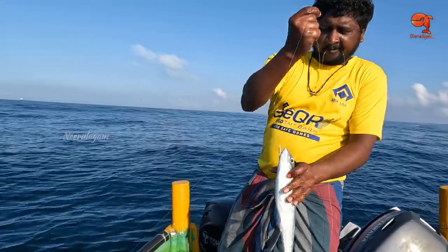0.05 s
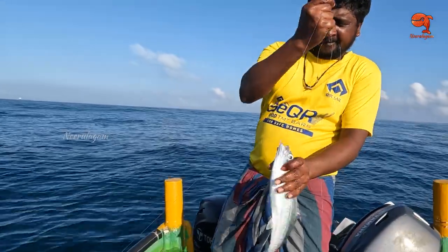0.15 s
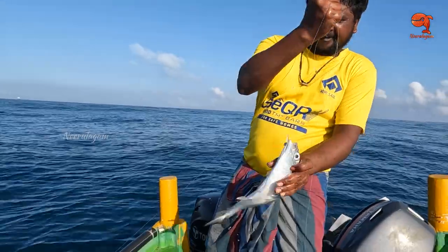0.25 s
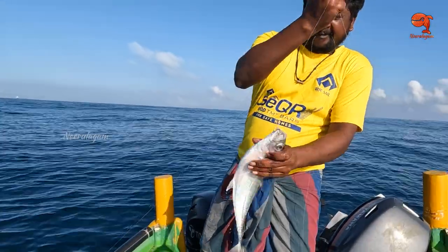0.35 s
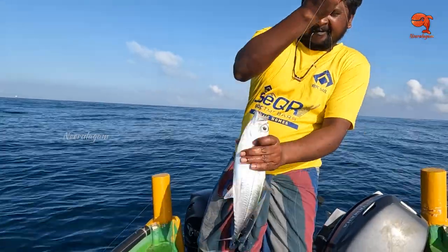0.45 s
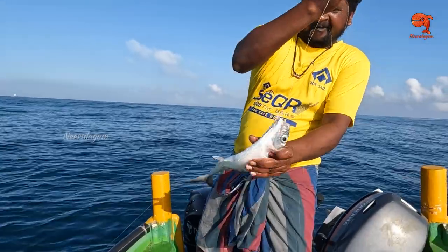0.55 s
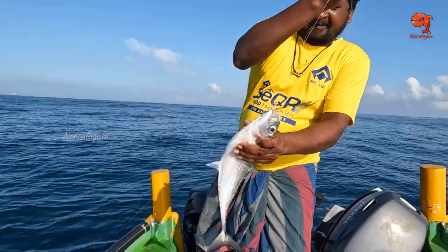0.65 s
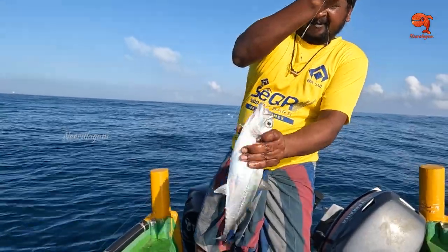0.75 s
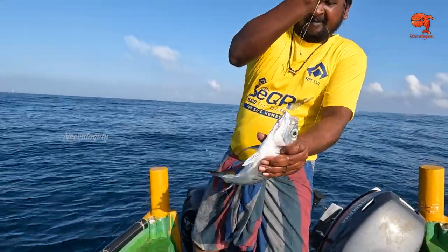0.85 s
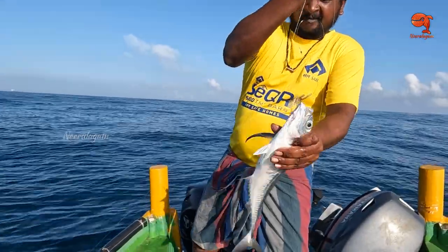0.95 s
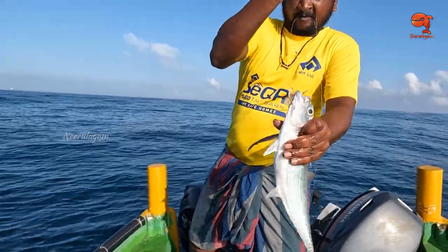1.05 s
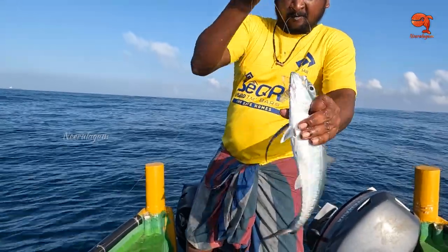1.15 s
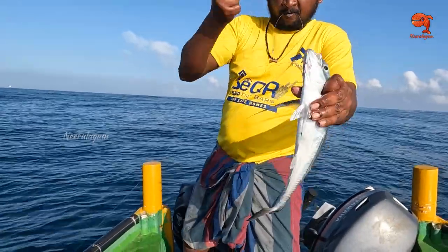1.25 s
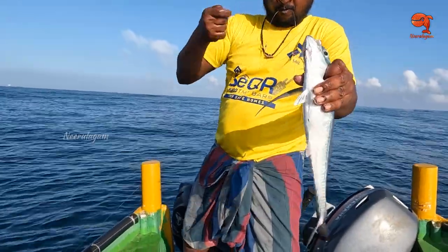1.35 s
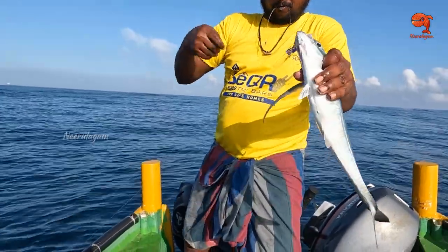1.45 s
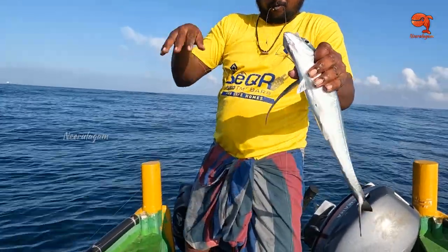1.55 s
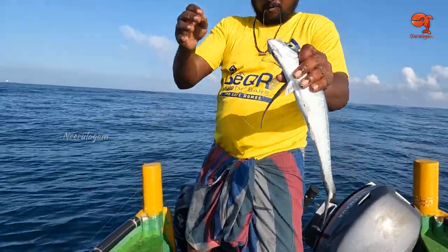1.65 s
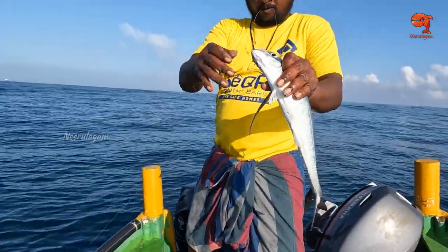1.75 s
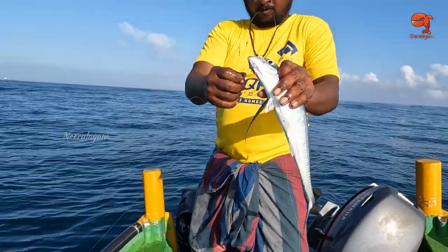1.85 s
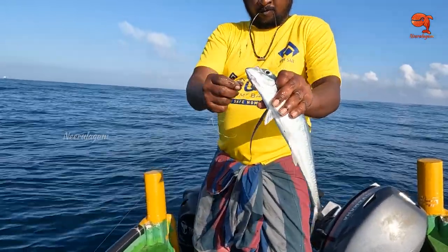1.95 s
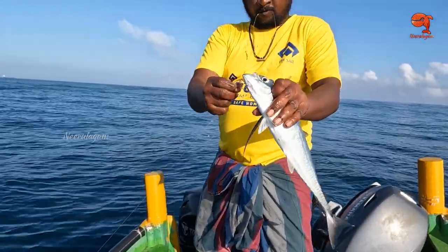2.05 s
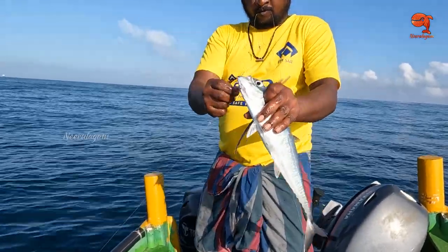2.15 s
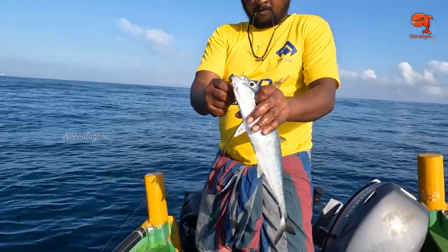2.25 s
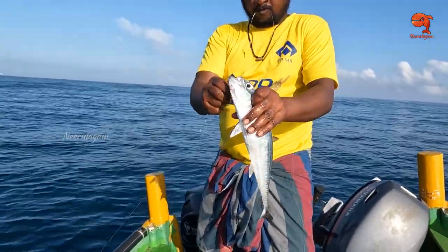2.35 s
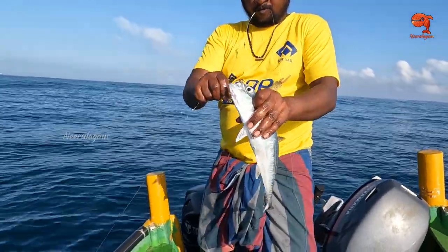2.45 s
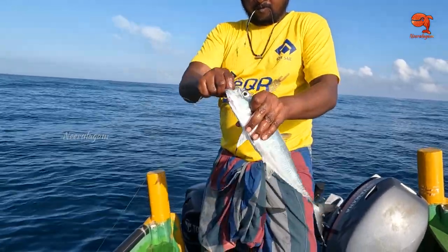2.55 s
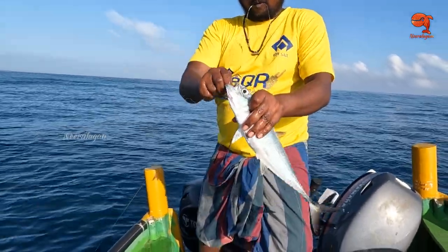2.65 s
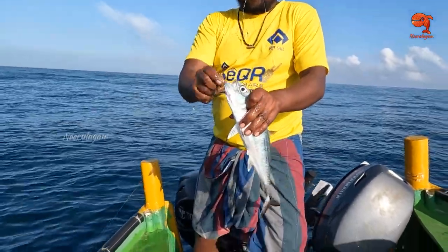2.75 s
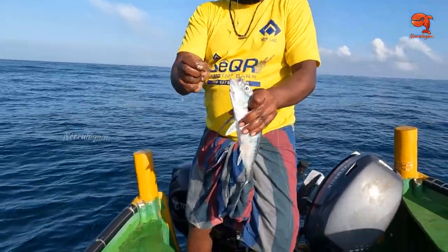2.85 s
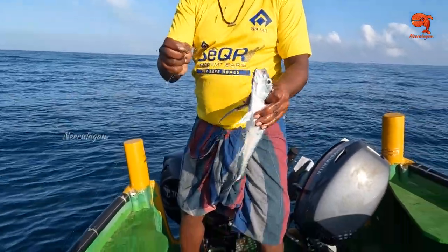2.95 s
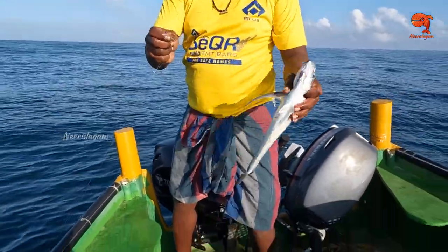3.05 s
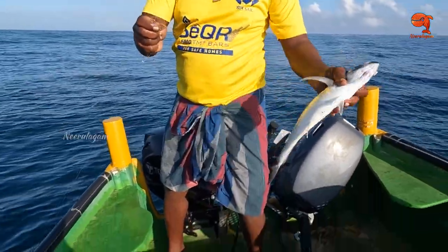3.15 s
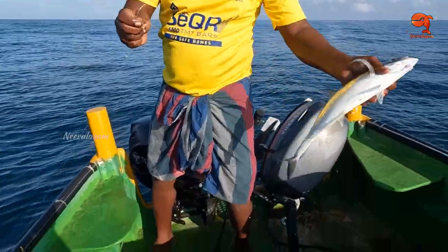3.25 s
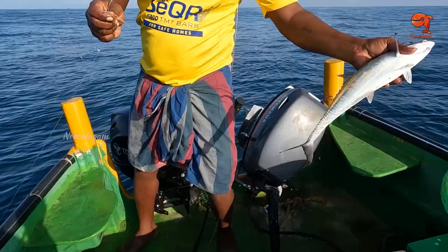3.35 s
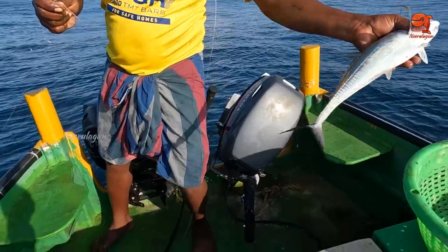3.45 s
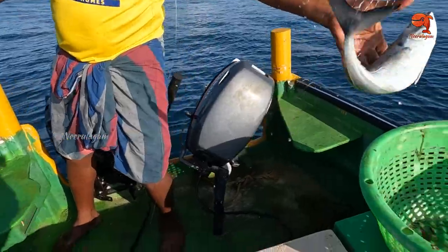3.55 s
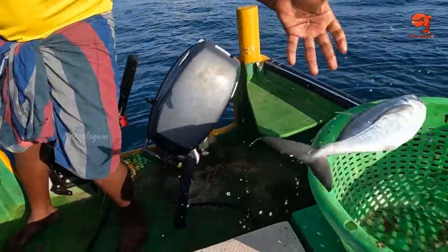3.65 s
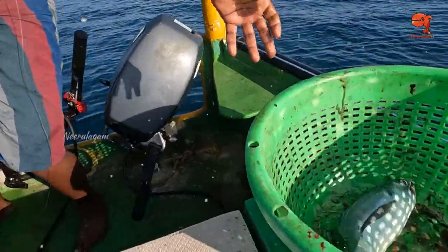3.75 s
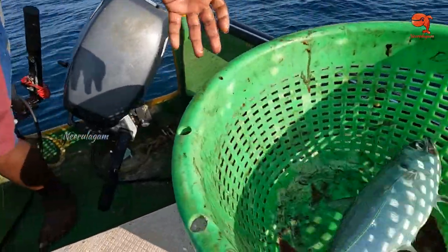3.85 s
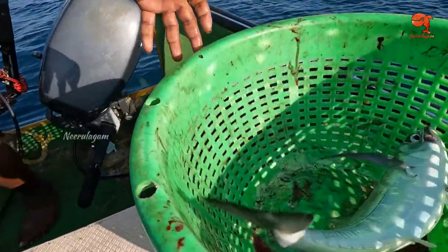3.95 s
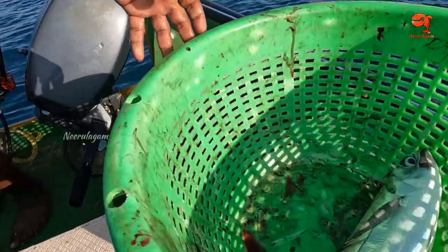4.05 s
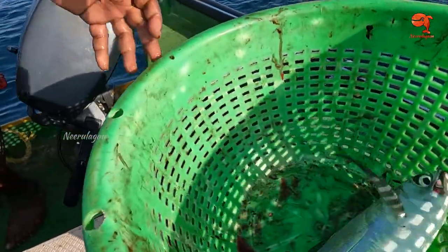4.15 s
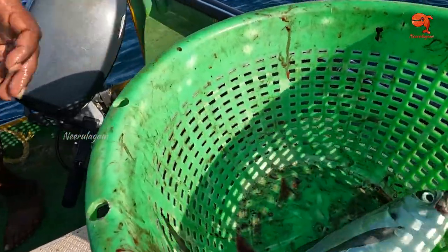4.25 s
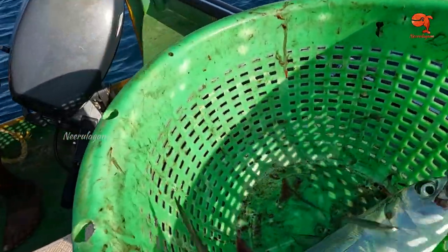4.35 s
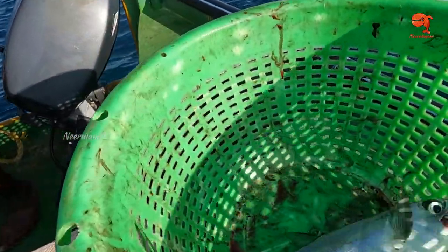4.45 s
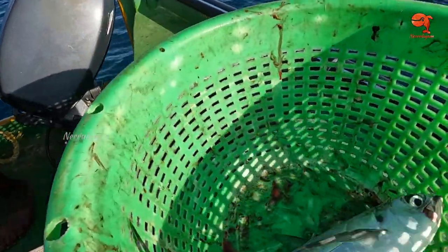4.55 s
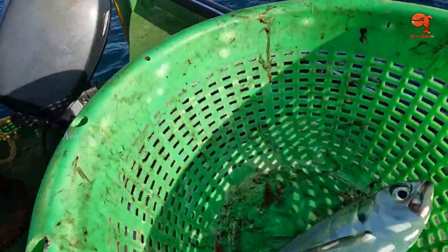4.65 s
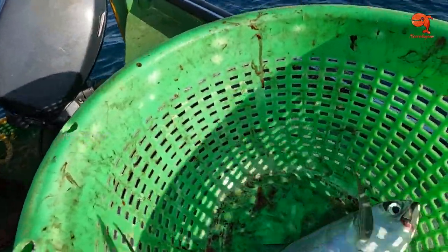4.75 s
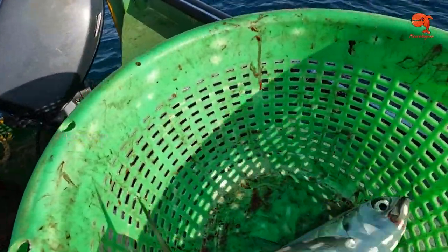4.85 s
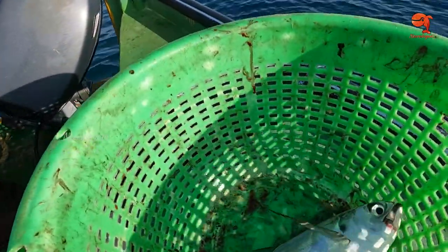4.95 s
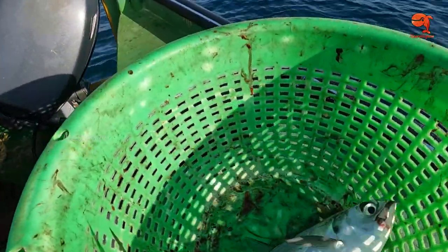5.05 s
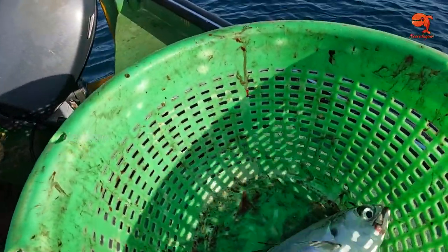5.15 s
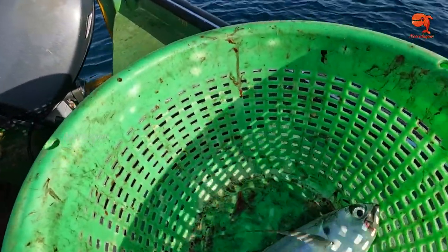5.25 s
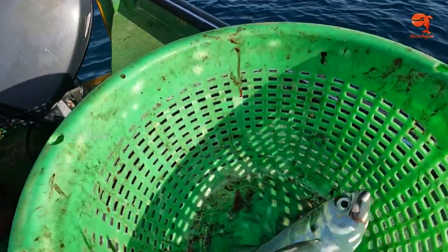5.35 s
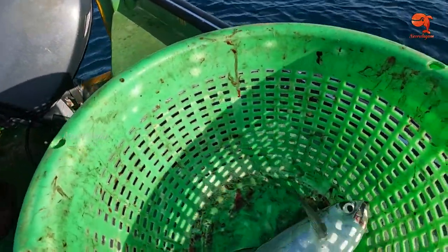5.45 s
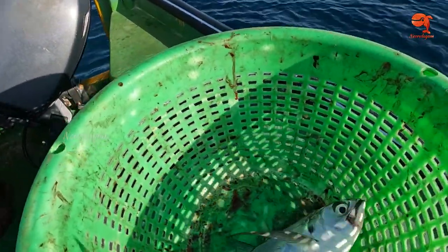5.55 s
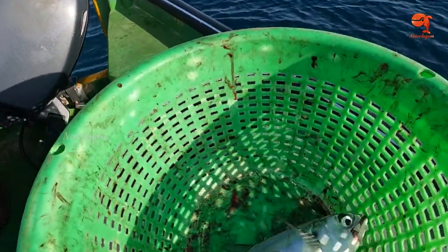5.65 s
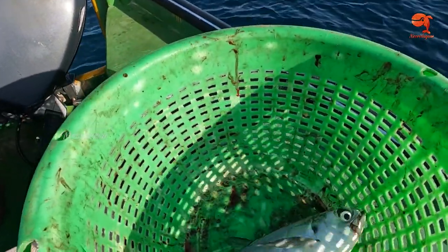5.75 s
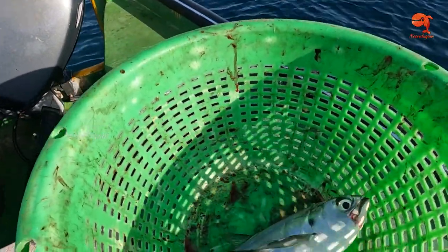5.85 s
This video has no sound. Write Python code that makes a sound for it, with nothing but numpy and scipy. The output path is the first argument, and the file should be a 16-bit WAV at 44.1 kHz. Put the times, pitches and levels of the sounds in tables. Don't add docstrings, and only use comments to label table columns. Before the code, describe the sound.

On a small open boat at sea, a fish is unhooked close to the microphone: a dull hull knock, tiny metallic tackle clicks, drips and faint wet squeaks over soft water. Near four seconds it lands hard in a plastic lattice basket and thrashes in bursts of sharp wet slaps, rattling raps and low floor thumps. A wind gust rumbles on the right, and the flapping continues to the end.

```python
import sys
import numpy as np
from scipy import signal
from scipy.io import wavfile

SR = 44100
rng = np.random.default_rng(int(sys.argv[2]) if len(sys.argv) > 2 else 0)


def file_out(sig):
    cols = np.atleast_2d(sig).T
    lim = np.clip(cols, -1, 1)
    pcm = np.round(lim * 32767).astype(np.int16)
    wavfile.write(sys.argv[1], SR, pcm)


def invert_db(level):
    return 10 ** (np.asarray(level, dtype=float) / 20)


N = 260631

# start_s, peak_db, ring_hz, crack_re_ring_db
FLANK_SLAPS = [(3.871, -23.5, 1420, 3), (3.895, -10, 1630, -5), (3.919, -10.5, 1220, -2.5),
               (3.93, -21, 1200, -7), (3.954, -13, 1350, -19), (4.001, -28, 1660, 2.5),
               (4.025, -29.5, 1700, -5), (4.146, -24.5, 1380, -2), (4.18, -11, 1060, -11.5),
               (4.231, -27, 1540, -5.5), (4.319, -24, 1670, -2.5), (4.416, -39, 1330, -28),
               (4.482, -28, 1460, -2.5), (4.527, -16.5, 1030, -13), (4.57, -26.5, 1300, -15),
               (4.792, -15, 1230, -4.5), (4.806, -15, 1300, 1.5), (4.902, -30.5, 2200, 1),
               (4.922, -11.5, 1080, -7.5), (4.944, -44, 1510, 2), (5.016, -34, 1380, -6),
               (5.081, -31.5, 1260, -3.5), (5.311, -26, 1350, -8.5), (5.333, -15, 1350, -8),
               (5.404, -30.5, 1130, -13), (5.498, -23.5, 1690, -13.5), (5.522, -12, 1140, -14.5),
               (5.596, -33, 1290, -24), (5.762, -16.5, 1150, -13.5), (5.794, -24, 2000, -13.5)]
# start_s, peak_db, ring_hz
BONE_AND_FIN_RAPS = [(3.888, -13, 2100), (3.966, -24, 3300), (4.038, -25.5, 1810), (4.15, -17.5, 1310),
                     (4.374, -27, 1750), (4.588, -15, 1900), (4.651, -30, 1600), (4.78, -25, 1390),
                     (4.862, -22.5, 1750), (4.887, -24.5, 1250), (5.049, -16.5, 1560), (5.215, -27, 1330),
                     (5.241, -19.5, 1300), (5.277, -14.5, 1760), (5.285, -22.5, 1050), (5.297, -26, 1370),
                     (5.324, -24.5, 1150), (5.388, -26.5, 1380), (5.464, -32, 1510), (5.555, -23, 1360),
                     (5.578, -15.5, 1350), (5.588, -19, 1140), (5.62, -17.5, 1100), (5.63, -18.5, 1260),
                     (5.666, -28, 1600), (5.784, -26.5, 1720), (5.818, -25.5, 1200), (5.833, -24, 1280),
                     (3.984, -36, 1300), (4.067, -41.5, 1800), (4.157, -40, 1610), (4.167, -49, 1700),
            (4.204, -32, 1400), (4.296, -33.5, 1360), (4.318, -34, 2930), (4.336, -31.5, 1890),
            (4.43, -47, 1500), (4.513, -44.5, 1160), (4.575, -34, 2000), (4.605, -36, 1400),
            (4.657, -41, 1800), (4.7, -43.5, 1500), (4.735, -45, 1310), (5.488, -34, 1770),
            (5.572, -25, 2230), (5.642, -48, 1400), (5.685, -40, 1300), (5.729, -43.5, 4000),
            (5.771, -29, 1310), (5.803, -34, 1490), (5.812, -33, 4030), (5.863, -35.5, 1200),
            (5.904, -35.5, 2200)]
# start_s, peak_db
FIN_GRAZES = [
    (4.913, -33),
    (4.962, -30),
    (5.134, -31),
    (5.163, -34.5),
    (5.269, -29),
    (5.693, -33.5),
    (5.891, -39),
]
# mode_hz, level_db, t60_s
LATTICE_MODES = [(1070, -5, 0.035), (1330, 8, 0.0054), (1750, 1, 0.0047), (2300, -10.5, 0.0017),
                 (3226, -24.5, 0.037)]
# start_s, level_db, drum_hz
BODY_FLOPS = [(3.894, -7, 95.6), (3.936, -6, 94.2), (4.155, -14.5, 94.6), (4.215, -19, 103.2),
              (4.584, -23.5, 99), (4.613, -29.5, 119), (4.647, -29.5, 109), (5.469, -20, 112),
              (5.499, -25.5, 104.4), (5.567, -18, 119.4), (5.593, -10, 99), (5.634, -11.5, 104),
              (5.72, -25.5, 100.4), (5.818, -15.5, 104.7), (5.865, -23, 101.6)]
# start_s, level_db, drum_hz
TAIL_BEATS = [(4.04, -16.5, 107), (4.807, -16.5, 88.4), (4.89, -16, 120.4), (4.914, -15.5, 108),
              (4.932, -11, 99), (4.992, -21, 108), (5.017, -32, 106), (5.045, -15, 129.4),
              (5.081, -39, 110), (5.174, -13.5, 105), (5.247, -17, 111), (5.263, -20.5, 120),
              (5.309, -13.5, 98.5)]
# start_s, peak_db, ring_hz
HARD_SNAPS = [(0.4595, -36, 3500), (0.8206, -26.5, 5000), (1.079, -24.5, 3540), (1.1094, -33, 5000),
              (1.1438, -34, 4500), (1.1558, -30, 4500), (1.1947, -17.5, 3020), (1.2536, -25, 7000),
              (2.4135, -37, 2500), (3.063, -34, 7750), (3.8716, -11, 6000), (3.889, 3, 2000),
              (3.8965, -16, 3500), (3.8995, 0.5, 3000), (3.9225, -11, 3520), (3.9555, -5.5, 2300),
              (4.528, -29, 3000), (4.5765, -13.5, 5500), (4.588, -17, 2500), (4.923, -15.5, 2150),
              (5.636, -3.5, 1480), (3.9204, -2, 2420), (0.44, -22.5, 1960)]
# start_s, peak_db, ring_hz, crack_re_ring_db
HULL_TICKS = [(0.025, -23.5, 2070, 0.5), (0.03, -19.5, 784, -6), (0.061, -29.5, 930, -20),
              (0.142, -35.5, 820, -14), (0.207, -46, 1400, -11), (0.438, -31.5, 2050, -18),
              (0.457, -43.5, 2270, -19), (0.549, -38, 1830, -6.5), (0.76, -50.5, 1900, 6),
              (0.891, -35.5, 1350, -25.5), (0.916, -38.5, 1370, -38), (1.177, -29.5, 1300, -15),
              (1.191, -27, 1070, -15), (1.233, -31, 1430, 5.5), (1.252, -33.5, 6660, 14.5),
              (2.183, -41, 2320, -17), (2.321, -34.5, 1000, -23), (2.346, -26, 870, -28),
              (2.36, -29, 1020, -43), (2.413, -28, 1750, -31), (2.415, -31.5, 3580, -15),
              (2.673, -36, 1640, -26.5), (2.827, -34, 2310, -50), (2.84, -38, 2270, -23),
              (3.063, -59, 5030, 15), (3.23, -44.5, 1430, -11), (3.324, -35, 1130, -34),
              (3.362, -38, 1070, -8), (3.682, -33, 2030, -5)]
# start_s, peak_db, ring_hz
TACKLE_CLICKS = [(0.819, -30.5, 4250), (1.078, -27.5, 3460), (1.111, -36.5, 5860), (1.143, -34, 3900),
                 (1.156, -32.5, 3700), (1.196, -30.5, 3070), (1.239, -25, 4800), (1.479, -39.5, 7200),
                 (1.513, -37, 5500), (1.701, -47, 5330), (2.566, -45.5, 5600), (2.71, -34.5, 3750),
                 (2.81, -40, 5260), (3.635, -33, 3500), (3.789, -34, 5200), (3.835, -37, 5750),
                 (5.592, -20.5, 4900)]
# start_s, peak_db, ring_hz
SMALL_FLICKS = [(0.065, -37, 4360), (0.117, -50, 2600), (0.15, -48, 5300), (0.163, -44.5, 2920),
                (0.198, -56, 7170), (0.212, -55, 4800), (0.271, -60, 4820), (0.298, -55, 3500),
                (0.325, -58, 6050), (0.447, -50, 7700), (0.485, -50, 2080), (0.536, -67, 3000),
                (0.567, -59, 1980), (0.608, -56, 7000), (0.668, -51, 4000), (0.697, -44.5, 6000),
                (0.712, -44, 1970), (0.766, -48, 2800), (0.862, -42.5, 4360), (0.92, -41.5, 3730),
                (0.99, -52, 4540), (1.037, -47, 6740), (1.564, -50, 2200), (1.688, -46, 5250),
                (1.826, -69, 1710), (1.839, -47.5, 1870), (1.975, -47.5, 2080), (2.014, -49, 1950),
                (2.123, -48.5, 2930), (2.162, -47, 2270), (2.33, -47, 2210), (2.345, -36.5, 6450),
                (2.363, -48, 2200), (2.452, -43.5, 3250), (2.477, -47, 2440), (2.493, -47, 2730),
                (2.537, -46, 1610), (2.655, -51, 2680), (2.707, -42, 1580), (2.735, -47, 3380),
                (2.74, -48.5, 1460), (2.814, -37.5, 2560), (2.843, -41.5, 5340), (2.902, -46, 3160),
                (2.994, -47, 2430), (3.065, -47, 1160), (3.288, -55, 2000), (3.334, -42, 3600),
                (3.388, -43, 1500), (3.43, -61, 4400), (3.442, -41.5, 1730), (3.457, -59, 4320),
                (3.471, -45, 1770), (3.488, -51, 4240), (3.5, -51, 4500), (3.518, -47, 4700),
                (3.629, -37, 1270), (3.685, -33.5, 3260), (3.743, -58, 5060), (3.791, -63, 1290),
                (1.137, -45, 2500), (1.162, -45, 3000), (1.176, -28.5, 3200), (1.208, -39, 2200),
              (1.223, -34, 3000), (1.27, -48, 4000), (2.35, -42, 1000), (4.115, -44, 1700),
              (4.128, -32.5, 6160), (4.842, -37, 1210), (4.878, -29.5, 4600), (4.998, -39.5, 1300),
              (5.028, -41, 2470), (5.115, -34, 1090), (5.19, -37, 1000), (5.251, -38, 1100),
              (5.35, -53, 1380), (5.397, -34, 2500)]
# time_s, left_re_right_db
HANDS_PLACE = [(0, 4), (0.25, 24), (0.42, -4), (0.6, 0), (0.9, 6.5), (1.08, -5.5), (1.2, 2), (1.26, 1.5),
               (1.8, 7), (2.35, 6.5), (2.42, 2.5), (3.1, 2), (3.33, 6), (3.5, 8), (3.63, -4), (3.7, -6.5),
               (3.79, 4), (5.91, -1)]
# start_s, level_db, knock_hz
HULL_KNOCKS = [(0.031, -9, 177.3), (0.0283, -11.5, 334), (0.041, -11.5, 191.4), (0.918, -35, 261),
               (1.19, -27, 266), (1.246, -27, 410), (1.379, -30.5, 208), (1.561, -33, 397),
               (1.842, -31.5, 298), (2.009, -26.5, 118.7), (2.319, -29.5, 324), (2.347, -20.5, 406),
               (2.36, -24, 442), (3.335, -26.5, 310), (3.361, -26.5, 374), (3.549, -24.5, 162.3)]
# start_s, level_db, knock_hz
JOLTS_AND_BUFFETS = [(3.894, -19.5, 289), (3.93, -20, 244), (3.99, -30.5, 308), (4.05, -28, 290),
                     (4.151, -25.5, 259), (4.225, -29, 280), (4.783, -14.5, 193), (4.797, -13.5, 333),
                     (4.89, -27, 238), (4.909, -22, 307), (4.974, -16.5, 224.6), (5.024, -22, 265),
                     (5.054, -20, 214), (5.113, -23.5, 252), (5.15, -21, 200), (5.185, -22.5, 332),
                     (5.205, -18, 243), (5.241, -32.5, 391), (5.267, -27.5, 223), (5.309, -26, 285),
                     (5.389, -23, 196), (5.534, -32, 187),(5.585, -21, 258), (5.832, -26.5, 277)]
# start_s, length_s, level_db, first_hz, last_hz
SKIN_SQUEAKS = [(0.614, 0.032, -46.5, 1016, 1230), (0.814, 0.056, -51.5, 1730, 1770),
                (0.999, 0.037, -53, 1230, 1280), (2.176, 0.046, -55, 1380, 1400),
                (2.83, 0.0093, -40, 1260, 1150), (2.844, 0.014, -44, 1280, 1320),
                (2.858, 0.036, -52.5, 1140, 1080), (2.899, 0.028, -41, 1110, 1125),
                (3.396, 0.021, -48.5, 1600, 1590), (3.428, 0.067, -59, 4300, 4450),
                (3.673, 0.0136, -37.5, 1570, 2070), (4.113, 0.021, -43.5, 2560, 2530),
                (4.762, 0.0263, -42.5, 2090, 2900), (4.764, 0.016, -45, 1040, 1230)]
# peak_s, wet_db, hull_db, fade_20db_s
BODY_MOVES = [(0.036, -37.5, -20, 0.1), (0.19, -46.5, -30.5, 0.24), (0.449, -61, -39.5, 0.5),
              (.7, -59, -54, 1), (0.918, -53.5, -39.5, 0.34), (1.233, -40.5, -29.5, 0.1133),
              (1.4, -52.5, -39.5, 0.04), (1.577, -50.5, -40, 0.19), (1.863, -55.5, -36, 0.25),
              (2.03, -55.5, -44, 0.15), (2.191, -50, -50, 0.02), (2.351, -48.5, -25, 0.0466),
              (2.47, -55.5, -38, 0.55), (2.701, -53.5, -31.5, 0.1), (2.84, -51, -49, 0.3),
              (3.09, -67, -42.5, 0.8), (3.354, -42, -26.5, 0.03), (3.45, -51, -39.5, 0.35),
              (3.69, -55, -46, 0.23), (3.923, -37, -30.5, 0.21), (4.182, -36.5, -28.5, 0.11),
              (4.33, -52, -53.5, 1.56), (4.521, -41, -51, 0.15), (4.59, -62, -41, 0),
              (4.815, -36, -27.5, 0.09), (5.05, -57.5, -28.5, 0.4), (5.251, -54, -23.5, 0.36),
              (5.6, -51, -33, 0.4), (5.79, -45, -45.5, 0.05)]
# time_s, rumble_db, left_re_right_db
WIND_CURVE = [
    (0, -34, 1.5),
    (1.2, -41, 0.5),
    (3.6, -40.5, .5),
    (3.85, -31.5, -1),
    (4.3, -37.5, -1),
    (4.75, -29.5, 0),
    (4.88, -19.5, -13.5),
    (5.35, -27, -11),
    (5.5, -29, 3.5),
    (5.91, -29, -4),
]
# band_hz, density_db
WATER_SPECTRUM = [(350, -50), (829, -2.5), (1460, -1), (2220, -8.5), (4840, -12.5), (9880, -27.5),
                  (13100, -30), (15000, -63)]
# band_hz, density_db
BUFFET_SPECTRUM = [(70, -13), (180, -4.5), (310, -11), (540, -11), (750, -32), (950, -41), (1600, -60)]
# band_hz, density_db
RUMBLE_SPECTRUM = [(15, -16), (35, -7), (75, -6.5), (120, -15), (180, -10.5), (300, -51)]
# band_hz, density_db
SEA_SPECTRUM = [(450, -6), (560, 8), (900, -32), (1730, -17), (3700, -32.5), (7600, -13.5), (11600, -55),
                (14500, -56)]
# band_hz, likeness_ratio
STEREO_LIKENESS = [(60, 1), (240, 1), (950, 0.9), (3770, 0.57), (15000, 0.95)]


def rms_one(x):
    return x / np.sqrt(np.mean(x ** 2) + 1e-20)


def in_time(rows):
    time_s, *columns = np.transpose(rows)
    return [np.interp(np.arange(N) / SR, time_s, column) for column in columns]


def at_hz(points, hz):
    point_hz, value = np.array(points).T
    return np.interp(np.log(hz), np.log(point_hz), value)


def sides(pan_db):
    return invert_db(np.multiply.outer([0.5, -0.5], pan_db)).reshape(2, -1)


def bandpass(x, low_hz, high_hz):
    return signal.sosfilt(signal.butter(2, [low_hz, high_hz], "band", fs=SR, output="sos"), x)


def drift(rate_hz):
    step, warmup = 40, 2000
    pole = np.exp(-2 * np.pi * rate_hz * step / SR)
    white = rng.standard_normal(N // step + warmup + 2)
    slow = signal.lfilter([1], [1, -2 * pole, pole * pole], white)[warmup:]
    return np.interp(np.arange(N) / step, np.arange(len(slow)), rms_one(slow))


def ring(x, hz, t60_s):
    radius = invert_db(-60 / (t60_s * SR))
    angle = 2 * np.pi * hz / SR
    return signal.lfilter([0, np.sin(angle)], [1, -2 * radius * np.cos(angle), radius * radius], x + 1e-18)


def add(out, start_s, sound):
    i = max(round(start_s * SR), 0)
    out[:, i:i + sound.shape[1]] += sound[:, :N - i]


def strike(hz, crack_db, modes, contact_s, t60_s, shared_db, tail_db, tail_s):
    t = np.arange(3000) / SR
    press = t / contact_s * np.exp(1 - t / contact_s)
    slide = invert_db(tail_db) * np.exp(-t / tail_s) * (1 - np.exp(-t / contact_s))
    grain = rng.standard_normal((3, len(t)))
    rough_db = 9.34 * rng.standard_normal(len(t))
    grit = grain * invert_db(rough_db)
    burst = grit * press + 2 * grain * invert_db(rough_db / 2) * slide
    push = burst[0] + 0.23 * burst[1:]

    own_ring = ring(push, hz, t60_s)
    shared_ring = 0
    for mode_hz, mode_db, mode_t60_s in modes:
        spot_db = rng.normal(0, 0.73)
        shared_ring = shared_ring + invert_db(mode_db + spot_db + shared_db) * ring(push, mode_hz, mode_t60_s)
    body = bandpass(own_ring + shared_ring, 850, 6500)

    spray = (grit[0] + 0.49 * grit[1:]) * (press ** 0.75 + 0.19 * slide)
    mist = bandpass(grit[1:] * press, 10000, 13500) * sides(9.0)
    crack = bandpass(spray, 3300, 8500) + 0.17 * mist
    crack = invert_db(crack_db) * crack / np.abs(crack).max() * sides(0.53)
    return body / np.abs(body).max() + crack


def wall_slaps():
    out, trim_db, tail_db = np.zeros((2, N)), 2.0, -9
    for start_s, db, hz, crack_db in FLANK_SLAPS:
        hit = strike(hz, crack_db, LATTICE_MODES, 0.0017, 0.012, -4.0, tail_db, tail_s=0.012)
        add(out, start_s, invert_db(db + trim_db) * hit)
    raps = [row + (-20.5,) for row in BONE_AND_FIN_RAPS]
    grazes = [row + (1350, -18) for row in FIN_GRAZES]   # ring_hz, crack_db
    for start_s, db, hz, crack_db in raps + grazes:
        hit = strike(hz, crack_db, LATTICE_MODES, 0.0014, 0.0094, -9.5, tail_db, tail_s=0.01)
        add(out, start_s, invert_db(db + trim_db) * hit)
    return out * sides(-0.52)


def pushes(rows, cycles, partners, spread):
    out, t = np.zeros((2, N)), np.arange(9000) / SR
    for start_s, db, hz, rise_s in rows:
        t60_s = cycles / hz
        swell = np.sin(np.pi / 2 * np.minimum(t / (2 * rise_s), 1)) ** 2
        after_s = np.maximum(t - 2 * rise_s, 0)
        phase = rng.uniform(0, 2 * np.pi, 4)
        chance = rng.normal(0, 2.5, 4)
        side_phase = spread * np.array([[0.5], [-0.5]]) * chance[3]
        tone = np.sin(2 * np.pi * hz * t + phase[3] + side_phase) * invert_db(-60 * after_s / t60_s)
        for k, (ratio, partner_db) in enumerate(partners):
            fading_db = partner_db + chance[k] - 60 * after_s / t60_s * ratio ** 0.5
            tone = tone + invert_db(fading_db) * np.sin(2 * np.pi * hz * ratio * t + phase[k])
        add(out, start_s - rise_s, invert_db(db) * swell * tone)
    return out


def floor_drum():
    flops = [row + (0.0152,) for row in BODY_FLOPS]
    beats = [row + (0.0071,) for row in TAIL_BEATS]
    return pushes(flops + beats, 13.8, [(1.9, -15)], spread=0.0065) * sides(0.089)


def snaps():
    out, click = np.zeros((2, N)), np.arange(400) == 0
    for start_s, db, hz in HARD_SNAPS:
        rung = ring(click * sides(rng.normal(0.5, 2.5)), hz, 3.2 / hz)
        blunt = signal.butter(2, min(2 * hz, SR / 3), fs=SR)
        add(out, start_s, invert_db(db) * signal.lfilter(*blunt, rung))
    return out


def ticks():
    out = np.zeros((2, N))
    for start_s, db, hz, crack_db in HULL_TICKS:
        hit = strike(hz, crack_db, LATTICE_MODES[2:5], 0.0019, 13.5 / hz, -19.0, -1.3, tail_s=0.012)
        add(out, start_s, invert_db(db) * hit)
    for start_s, db, hz in TACKLE_CLICKS:
        hit = strike(hz, -13.5, LATTICE_MODES[2:5], 0.00064, 10.2 / hz, -21.0, -4.5, tail_s=0.0085)
        add(out, start_s, invert_db(db) * hit)
    for start_s, db, hz in SMALL_FLICKS:
        hit = strike(hz, -9.5, LATTICE_MODES[2:4], 0.0007, 13.6 / hz, -32.0, -2.5, tail_s=0.01)
        add(out, start_s, invert_db(db) * hit)
    return out * sides(in_time(HANDS_PLACE)[0])


def knocks():
    hull_rows = [row + (0.0015,) for row in HULL_KNOCKS]
    jolt_rows = [row + (0.004,) for row in JOLTS_AND_BUFFETS]
    hull = pushes(hull_rows, 18.6, [(1.75, -6.5), (2.65, -13), (4.4, -19.5)], spread=0.032)
    return hull + pushes(jolt_rows, 21.0, [(1.6, -10), (2.5, -22)], spread=0.051)


def squeaks():
    out = np.zeros((2, N))
    for start_s, length_s, db, first_hz, last_hz in SKIN_SQUEAKS:
        part = np.arange(round(length_s * SR)) / (length_s * SR)
        waver = signal.lfilter([0.02], [1, -0.98], rng.standard_normal(3000))[:len(part)]
        glide_hz = (first_hz + (last_hz - first_hz) * part) * (1 + 0.54 * waver)
        phase = np.cumsum(2 * np.pi / SR * glide_hz)
        tone = np.sin(phase) + invert_db(-first_hz / 45) * np.sin(2 * phase)
        add(out, start_s, invert_db(db) * np.sin(np.pi * part ** 0.58) * tone * sides(0))
    return out


def stirring(peak_db, rest_db, rise_share):
    move_s, _, _, fade_s = np.array(BODY_MOVES).T[:, :, None]
    step = 64
    late = (np.arange(0, N + step, step) / SR - move_s) / np.maximum(fade_s, 0.01)
    fall_db = 20 * np.maximum(late, -late / rise_share)
    power = invert_db(peak_db[:, None] - fall_db) ** 2
    gain = np.sqrt(power.sum(axis=0) + invert_db(rest_db) ** 2)
    return np.interp(np.arange(N) / step, np.arange(late.shape[1]), gain)


def banded_noise(spectrum, patchy_db, flicker_hz, loose):
    out, together = 0, drift(flicker_hz / 2)
    edges_hz = 15 * 2 ** np.arange(0, 10.6, 0.5)
    white = rng.standard_normal((2, 2, N))
    for k, (low_hz, high_hz) in enumerate(zip(edges_hz, edges_hz[1:])):
        hz = np.sqrt(low_hz * high_hz)
        if spectrum[0][0] < hz < spectrum[-1][0]:
            mid, side = bandpass(white[k % 2], low_hz, high_hz)
            alike = np.clip(at_hz(STEREO_LIKENESS, hz) - loose, 0, 1)
            gain = invert_db(at_hz(spectrum, hz) + patchy_db * (1.68 * together + drift(flicker_hz)))
            out = out + gain * (np.sqrt(1 + alike) * mid + np.sqrt(1 - alike) * side * [[1], [-1]])
    return rms_one(out)


def droplets(per_s):
    sizes = invert_db(10.0 * np.minimum(rng.exponential(1, N), 4)) * rng.choice([-1, 1], N)
    born = rng.random(N) < per_s * invert_db(5.0 * drift(9.0)) / SR
    chosen = rng.integers(0, 16, N) == np.arange(16)[:, None]
    soft = signal.lfilter([0.3], [1, -0.7], sizes * born * chosen)
    pans_db = np.clip(rng.normal(1, 3.0, 16), -6, 6)
    out = 0
    for clicks, pan_db, hz in zip(soft, pans_db, np.geomspace(900, 6000, 16)):
        out = out + sides(pan_db) * invert_db(at_hz(WATER_SPECTRUM, hz)) * hz * ring(clicks, hz, 45.0 / hz)
    return rms_one(out)


def crackles(per_s, fade_s):
    sizes = invert_db(5.0 * np.minimum(rng.exponential(1, N), 3.0)) * (rng.random(N) < per_s / SR)
    keep = np.exp(-1 / (fade_s * SR))
    puffs = signal.lfilter([1], [1, -keep], sizes * sides(rng.normal(4, 2.5, N)))
    white = rng.standard_normal((3, N))
    return rms_one(bandpass(puffs * (white[0] + 0.5 * white[1:]), 2500, 9000))


def water():
    wet = stirring(np.transpose(BODY_MOVES)[1], rest_db=-67, rise_share=0.71)
    rustle = banded_noise(WATER_SPECTRUM, 3.0, 30, loose=0.15)
    grains = invert_db(-9) * droplets(400)
    film = invert_db(-20.5) * crackles(70.0, 0.00072)
    return wet * invert_db(-3.5) * (rustle + grains + film)


def buffet():
    hull = stirring(np.transpose(BODY_MOVES)[2], rest_db=-56, rise_share=0.54)
    return hull * invert_db(-2.5) * banded_noise(BUFFET_SPECTRUM, 2.9, 35, loose=0.12)


def wind_rumble(rumble_db, pan_db):
    return invert_db(rumble_db) * banded_noise(RUMBLE_SPECTRUM, 0.9, 2.9, loose=0.03) * sides(0.3 * pan_db)


def far_sea():
    return invert_db(-63) * banded_noise(SEA_SPECTRUM, 1.2, 8, loose=0.1)


def scene():
    rumble_db, pan_db = in_time(WIND_CURVE)
    drum = floor_drum()
    boards = knocks()
    rumble = wind_rumble(rumble_db, pan_db)
    hull = (boards + buffet()) * sides(pan_db)
    background = rumble + water() + far_sea()
    return wall_slaps() + ticks() + squeaks() + drum + hull + background + snaps()


def top_cut(x):
    return signal.sosfilt(signal.butter(12, 15710, fs=SR, output="sos"), x)


def record(dry):
    heard = signal.sosfilt(signal.butter(4, 13200, fs=SR, output="sos"), dry)
    mix = 0.93 * np.tanh(heard / 0.87)
    return top_cut(mix)


dry = scene()
out = record(dry)
file_out(out)
```